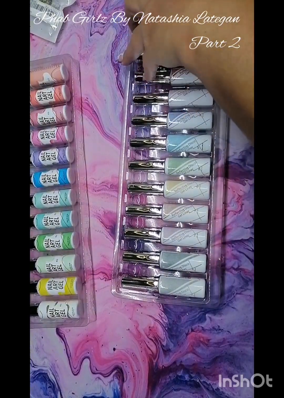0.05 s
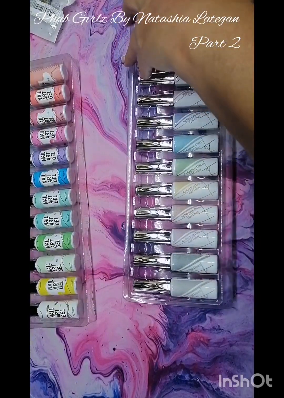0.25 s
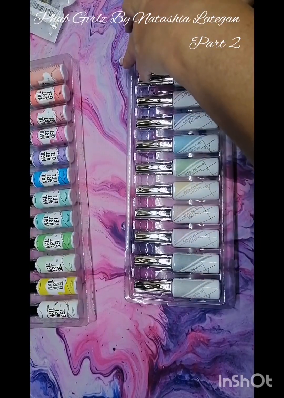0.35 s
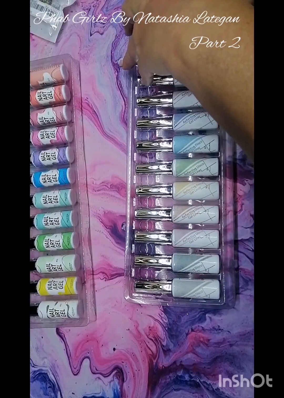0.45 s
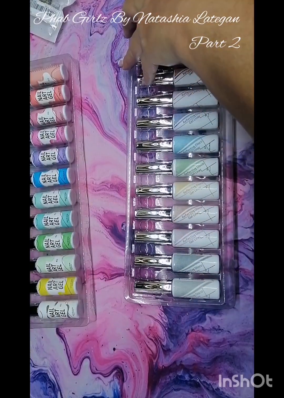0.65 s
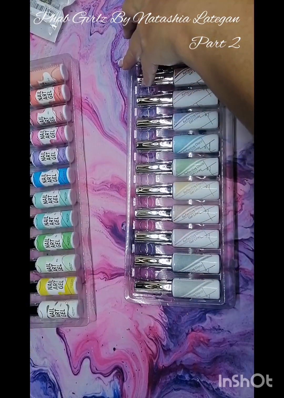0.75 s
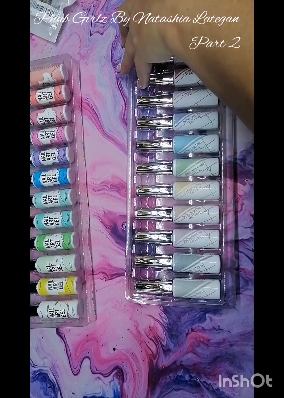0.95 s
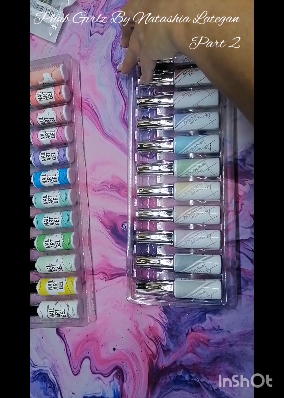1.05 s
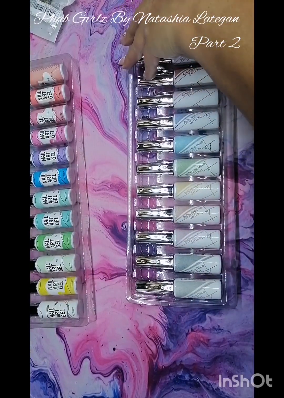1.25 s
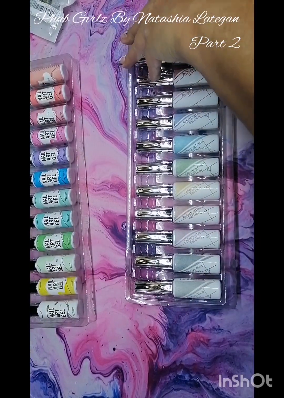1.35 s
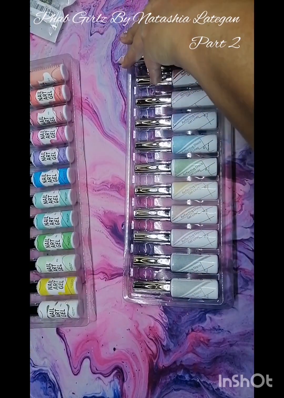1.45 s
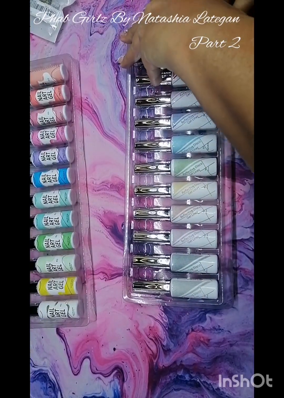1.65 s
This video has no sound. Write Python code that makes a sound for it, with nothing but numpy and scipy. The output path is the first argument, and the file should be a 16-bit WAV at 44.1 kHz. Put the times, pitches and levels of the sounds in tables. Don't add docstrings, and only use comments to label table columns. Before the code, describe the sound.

Crisp plastic tray snaps and rustles, bottles tapping in their cells, then one last sharp click

```python
import sys
import numpy as np
from scipy import signal
from scipy.fft import rfft, irfft, next_fast_len
from scipy.io import wavfile

SR = 44100
rng = np.random.default_rng(int(sys.argv[2]) if len(sys.argv) > 2 else 0)


def pcm_store(signal):
    levels = np.round(np.clip(np.atleast_2d(signal), -1, 1) * 32767)
    wavfile.write(sys.argv[1], SR, levels.astype(np.int16).T)


def gain_from_db(level_db):
    decades = np.asarray(level_db, float) / 20
    return 10 ** decades


N = 74970

# pitch in Hz, strength in dB, time to die away by 60 dB in seconds.
SHEET_TONES = [(4700, -2, .003), (5300, -1, .003), (6700, -1, .002), (8300, -1, .002), (10000, -3, .002),
               (12300, -9, .0015), (14800, -6, .002)]
WALL_TONES = [(1570, -2, 0.0098), (2000, -0.5, 0.0078), (2430, 2, 0.0076), (2900, -2, 0.011),
              (3300, -5.5, 0.01)]
HOLLOW_TONES = [(510, -8.5, 0.029), (599, -4, 0.058), (796, 1.5, 0.035), (933, 10.5, 0.02),
                (1100, 5.5, 0.024), (1270, 3.5, 0.017)]
TABLE_TONES = [(75, -14, .05), (119, -10.5, 0.1), (245.8, 0.5, 0.1), (302, -1.5, 0.047), (412, -0.5, 0.06),
               (464, -8.5, .05)]

SHEET_OWN, WALL_OWN, HOLLOW_OWN = 2.1, 1.57, 0.12
WALL_TOP_HZ = 3500


def rms_one(x):
    return x / np.sqrt(np.mean(x ** 2) + 1e-20)


def in_time(rows):
    s, *columns = np.transpose(rows)
    return [np.interp(np.arange(N) / SR, s, c) for c in columns]


def colour(x, points):
    hz, db = np.transpose(points)
    log_hz = np.log(np.fft.rfftfreq(x.shape[-1], 1 / SR) + 1)
    return irfft(rfft(x) * gain_from_db(np.interp(log_hz, np.log(hz), db)), x.shape[-1])


def above(hz, x):
    return signal.sosfilt(signal.butter(2, hz, "high", fs=SR, output="sos"), x)


def below(hz, x):
    return signal.sosfilt(signal.butter(4, hz, fs=SR, output="sos"), x)


def drift(hz):
    r = np.exp(-2 * np.pi * hz / SR)
    wander = signal.lfilter([1], [1, -2 * r, r * r], rng.standard_normal(N + SR))
    return rms_one(wander[SR:])


def ring(push, hz, t60):
    r = 1000. ** (-1 / (t60 * SR))
    w = 2 * np.pi * hz / SR
    return signal.lfilter([0, np.sin(w)], [1, -2 * r * np.cos(w), r * r], push + 1e-18)


def add(out, s, sound):
    i = int(s * SR)
    out[..., i:i + sound.shape[-1]] += sound[..., :N - i]


def struck(push, tones, detune):
    luck = rng.standard_normal((len(tones), 2))
    body = 0
    for (hz, db, t60), (louder, higher) in zip(tones, luck):
        body = body + gain_from_db(db + 2 * louder) * ring(push, hz * (1 + detune * higher), t60)
    return body / np.sqrt(np.mean(body[..., :SR // 100] ** 2))


def rustle():
    # time in seconds, level in dB, share of the hollows in dB.
    hand = [(0, -57.5, -16), (.11, -72, 0), (.135, -54.5, -12), (.22, -55, -8.5), (.27, -48.5, -6),
            (.32, -69.5, 7.5), (.345, -48.5, 5), (.45, -51.5, -1.5), (.53, -56, -10), (.57, -80.5, 9.5),
            (1.12, -73.5, 2), (1.17, -56.5, -7), (1.228, -62.5, -6), (1.265, -49, -8.5), (1.35, -60, 4),
            (1.39, -79, -7), (1.41, -55.5, -2), (1.7, -79.5, -8)]
    grains_per_s, grain_spread_db, clump_db, wall_share_db = 6500, 2.5, 5.5, 1.5
    level_db, hollow_db = in_time(hand)
    clump = gain_from_db(clump_db * drift(60))
    happens = rng.random(N) < grains_per_s * clump / SR
    grains = happens * gain_from_db(grain_spread_db * np.minimum(rng.exponential(1, N), 5))

    def rubbed(tones, own):
        body = 0
        for hz, db, t60 in tones:
            push = grains * (rng.standard_normal(N) + own * rng.standard_normal((2, N)))
            body = body + gain_from_db(db) * ring(push, hz, t60)
        return rms_one(above(tones[0][0] - 100, body))

    sheet = rubbed(SHEET_TONES, SHEET_OWN)
    walls = below(WALL_TOP_HZ, rubbed(WALL_TONES, WALL_OWN))
    hollows = rubbed(HOLLOW_TONES, HOLLOW_OWN)
    return gain_from_db(level_db) * (sheet + gain_from_db(wall_share_db + hollow_db / 2) * walls + gain_from_db(hollow_db) * hollows)


def rumble():
    # time in seconds, level in dB.
    tremble = [
        (0.0, -70.5),
        (.2, -68),
        (.5, -71),
        (.9, -71.5),
        (1.2, -66.5),
        (1.35, -72),
        (1.45, -80),
        (1.7, -95),
    ]
    top_hz, table_share_db, port_noise_db = 222, -3.5, -2
    shake = rng.standard_normal(N) + gain_from_db(port_noise_db) * rng.standard_normal((2, N))
    shake = shake * gain_from_db(2 * drift(6.6))
    low = signal.sosfilt(signal.butter(2, [22, top_hz], "band", fs=SR, output="sos"), shake)
    table = sum(gain_from_db(db) * ring(shake[0], hz, t60) for hz, db, t60 in TABLE_TONES)
    return gain_from_db(in_time(tremble)[0]) * (rms_one(low) + gain_from_db(table_share_db) * rms_one(table))


def snaps():
    # start in seconds, then the levels of sheet, cell walls and hollows in
    # dB.
    buckles = [(.0074, -41.5, -67, -72), (.0467, -37, -59, -58.5), (.0915, -49.5, -67, -65),
               (.1238, -47.5, -60.5, -63), (.1378, -44, -63, -58), (.1528, -37, -59, -49.5),
               (.1638, -44, -55.5, -51), (.1742, -38, -66, -58), (.1872, -36, -51, -59),
               (.1967, -40, -57, -58), (.2292, -26, -35, -28.5), (.2456, -25, -43, -40),
               (.2489, -31, -44.5, -42), (.2604, -32.5, -50, -44.5), (.2658, -33, -53, -46),
               (.336, -33, -48, -57), (0.343, -26.5, -45.5, -45), (.349, -41, -54, -46),
            (.365, -33, -48, -43.5), (.397, -34.5, -47.5, -39.5), (0.4062, -36, -44, -40),
            (0.418, -42, -48, -39), (0.4282, -32.5, -39.5, -37.5), (.439, -34, -42, -37),
            (0.4462, -33, -44, -43.5), (.455, -40, -49, -51), (0.4671, -21, -37, -43),
            (.488, -50, -50, -45.5), (.498, -33.5, -47, -45), (.513, -37, -52, -47), (.522, -36, -57, -54),
            (.532, -45, -49, -60),
               (.7584, -47, -74, -61), (.7637, -30, -62, -66), (.7704, -36, -59, -68),
           (0.7865, -32.5, -60, -63), (.7944, -36.5, -63, -61.5), (.8081, -35.5, -55.5, -59.5),
           (.8629, -51.5, -63.5, -73), (1.0191, -44, -57, -59.5), (1.049, -35.5, -55, -63),
           (1.066, -42, -63, -65), (1.1328, -56.5, -76, -69), (1.1514, -54, -68, -70),
           (1.1757, -33.5, -53, -65), (1.1992, -33.5, -55, -58), (1.2154, -46, -54, -60),
           (1.2366, -36.5, -54, -67),
               (1.256, -42, -59, -56), (1.263, -39, -48, -52), (1.276, -33, -54, -57),
            (1.287, -34.5, -39.5, -40.5), (1.3133, -40.5, -57, -56), (1.334, -37.5, -47, -49),
            (1.342, -46, -48, -49), (1.3973, -19, -40, -48.5), (1.4451, -50, -56, -70),
            (1.449, -48, -49.5, -59), (1.51, -52, -57, -57), (1.516, -60, -56, -57), (1.523, -46, -47, -57),
            (1.531, -52, -60, -54), (1.537, -47, -69, -58), (1.5764, -40.5, -66, -67),
            (1.582, -47.5, -58.5, -57.5), (1.598, -48, -60, -58.5), (1.6156, -39, -56, -56.5),
            (1.621, -47, -64, -58.5), (1.628, -47, -68, -63), (1.644, -60, -79, -77)]
    burst_s, settle_s, settle_db, softer = .0013, .009, -21.5, .28
    detune = .05
    out, t = np.zeros((2, N)), np.arange(SR // 15) / SR
    burst = t / burst_s * np.exp(-t / burst_s * 2) * 2 * np.e
    settle = np.exp(-t / settle_s) * (1 - np.exp(-t / burst_s))
    shade = signal.butter(6, 10500, fs=SR, output="sos")
    for s, sheet_db, wall_db, hollow_db in buckles:
        shape = burst + gain_from_db(settle_db - softer * sheet_db) * settle
        shared = rng.standard_normal(len(t)) * shape
        own = rng.standard_normal((2, len(t))) * shape
        sheet = above(5510, struck(shared + SHEET_OWN * own, SHEET_TONES, detune))
        if 1.3 < s < 1.55:
            sheet = signal.sosfilt(shade, sheet)
        walls = above(1506, struck(shared + WALL_OWN * own, WALL_TONES, detune))
        walls = below(WALL_TOP_HZ, walls)
        hollows = above(430, struck(shared + HOLLOW_OWN * own, HOLLOW_TONES, detune))
        hollows = above(384, hollows)
        snap = gain_from_db(sheet_db - 11) * sheet + gain_from_db(wall_db + 0.5) * walls + gain_from_db(hollow_db - 1.5) * hollows
        add(out, s, snap)
    return out


def hum():
    # start in seconds, peak level in dB.
    swells = [(0.051, -63.5), (.126, -53), (0.233, -44.5), (0.282, -46), (.345, -53.5), (0.411, -49.5),
              (.465, -55), (.512, -55.5), (0.599, -67), (.675, -64), (.742, -57.5), (0.908, -63.5),
              (1.019, -47), (1.065, -59), (1.15, -53), (1.222, -62), (1.284, -47), (1.339, -53),
              (1.4, -60.5), (1.455, -66)]
    pitch_hz, t60_s, rise_s, stop_s = 158.8, 0.22, 0.0061, 0.0034
    out, t = np.zeros(N), np.arange(SR // 2) / SR
    ends = [s for s, _ in swells[1:]] + [N / SR]
    luck = rng.standard_normal(len(swells))
    for (s, db), end, higher in zip(swells, ends, luck):
        shape = (1 - np.exp(-t / rise_s)) * 1000. ** (-t / t60_s)
        shape = shape * np.exp(-np.maximum(t + s - end, 0) / stop_s)
        tone = np.sin(2 * np.pi * pitch_hz * (1 + 0.03 * higher) * t)
        add(out, s, gain_from_db(db) * np.sqrt(2) * shape * tone)
    return out * gain_from_db(2 * drift(19))


def knocks():
    # start in seconds, level in dB.
    pushes = [
        (0.129, -63.5),
        (0.231, -41),
        (0.247, -41.5),
        (0.343, -50),
        (1.018, -48),
        (1.287, -53),
    ]
    # start in seconds, peak level in dB, pitch in Hz, 60 dB fade in
    # seconds.
    blows = [(.2297, -18.5, 830, 0.01), (.2325, -29, 874, 0.054), (0.2484, -23.5, 490, 0.0071),
             (.37, -38.5, 840, 0.051), (0.4673, -33, 1090, 0.014), (1.02, -48, 950, 0.043),
             (1.0196, -46, 412, 0.025), (1.2872, -22.5, 1034, 0.012), (1.343, -38, 862, .04),
             (1.3974, -27.5, 1100, 0.02), (1.3975, -22.5, 3240, 0.0068), (.338, -38, 2350, 0.014),
             (.399, -24.5, 2080, 0.027), (.4065, -34.5, 728, .03), (0.44, -31.5, 1206, 0.038),
             (.441, -45, 1920, 0.027), (0.4671, -27, 2900, 0.016), (0.5, -39, 2830, 0.018),
             (0.533, -38, 2790, .02), (1.3967, -28.5, 4490, 0.0042), (1.3981, -27, 1614, 0.024),
             (1.449, -37, 2270, .02), (1.621, -47, 2000, 0.017), (0.23, -36, 238, 0.13),
             (0.765, -43, 3000, 0.025), (0.785, -42.5, 3050, 0.021), (1.0178, -47.5, 104, 0.044),
             (1.173, -57, 91.5, .12), (1.2878, -32, 3290, 0.015), (1.2868, -47, 486, .03),
             (1.397, -33.5, 3770, 0.0061), (.145, -52.5, 510, 0.077), (1.176, -45, 4500, 0.0093),
             (0.7646, -40, 4520, 0.012), (1.398, -43.5, 430, 0.028), (1.019, -50, 288, .04)]
    out, t = np.zeros(N), np.arange(SR // 2) / SR
    soft_push = t * np.exp(-t / 0.00076)
    for s, db in pushes:
        add(out, s, gain_from_db(db) * above(130, struck(soft_push, TABLE_TONES, 0.028)))
    click = 1. * (t == 0)
    for s, db, hz, t60 in blows:
        add(out, s, gain_from_db(db) * above(hz / 2, ring(click, hz, t60)))
    return out


def room(x):
    t60_s, wall_cut_hz = 0.16, 15600
    size = next_fast_len(N + SR)
    w = 2j * np.pi * np.fft.rfftfreq(size, 1 / SR)
    dull = 1 / (1 + w / (2 * np.pi * wall_cut_hz))
    sides = [0, 0]
    for k, lag in enumerate(rng.uniform(.006, .03, 16)):
        loop = 1000. ** (-lag / t60_s) * dull * np.exp(-w * lag)
        sides[k % 2] = sides[k % 2] + loop / (1 - loop) * (-1) ** (k // 2)
    return irfft(rfft(x, size) * np.array(sides), size)[:, :N]


def ports(x):
    # pitch in Hz, difference in dB.
    lean = [(40, 5), (125, 5), (450, 10), (1100, 3), (4000, 3), (8000, 2), (14000, 4)]
    # time in seconds, left over right in dB.
    sideways = [
        (0, -0.5),
        (1.2, 0.5),
        (1.38, -1),
        (1.7, -5),
    ]
    lead_s = .00023
    hz, db = np.transpose(lean)
    late = np.interp(np.arange(N) - np.round(lead_s * SR), np.arange(N), x[1])
    left = colour(x[0], np.transpose([hz, db / 2]))
    right = colour(late, np.transpose([hz, -db / 2]))
    return np.array([left, right]) * gain_from_db(in_time(sideways)[0] * [[.5], [-.5]])


def air_noise():
    # pitch in Hz, level in dB.
    spectrum = [(15, -39), (25, -2), (157, 10), (317, -0.5), (962, 2.5), (1790, -10), (8360, -20),
                (14800, -34), (16000, -55)]
    return rms_one(colour(rng.standard_normal((2, N)), spectrum))


def scene():
    tray = snaps() + knocks() + hum() + rustle()
    air = gain_from_db(-70) * air_noise()
    echo = gain_from_db(-15) * room(above(143, tray[0]))
    return ports(tray + rumble()) + echo + air


def roll_off(x):
    return signal.sosfilt(signal.butter(12, 16640, fs=SR, output="sos"), x)


def record(dry):
    top_cut = signal.cheby2(12, 70, 16600, fs=SR, output="sos")
    mix = signal.sosfilt(top_cut, dry)
    return roll_off(mix)


dry = scene()
out = record(dry)
pcm_store(out)
```